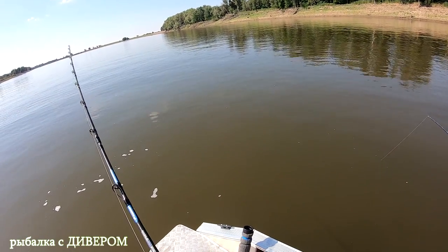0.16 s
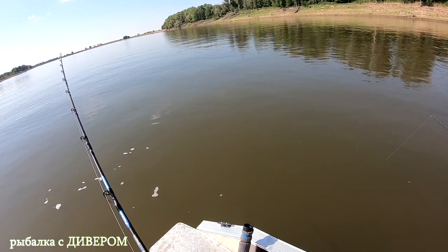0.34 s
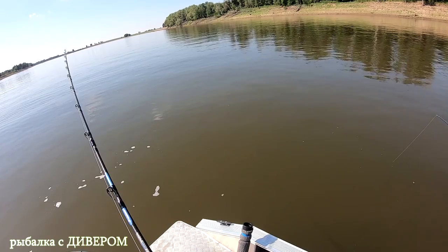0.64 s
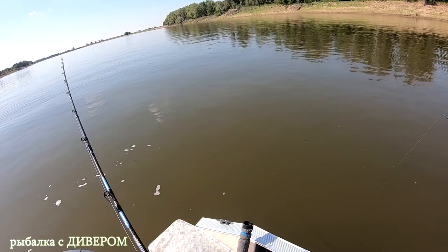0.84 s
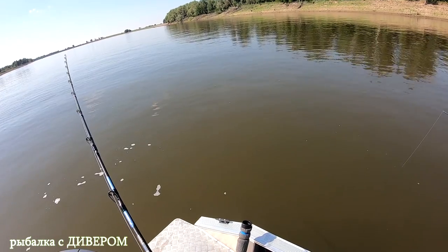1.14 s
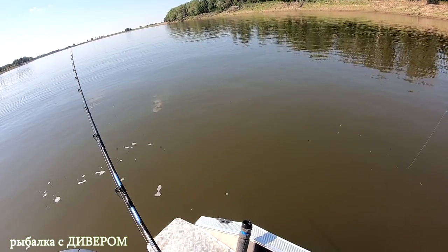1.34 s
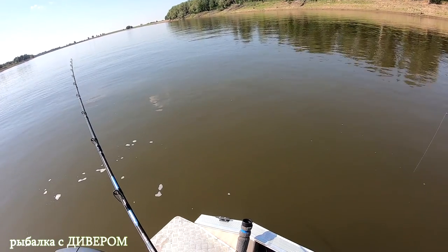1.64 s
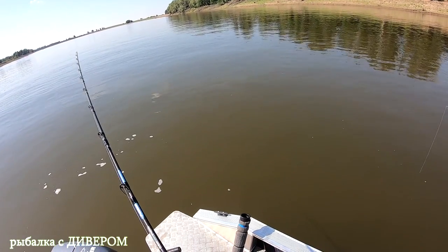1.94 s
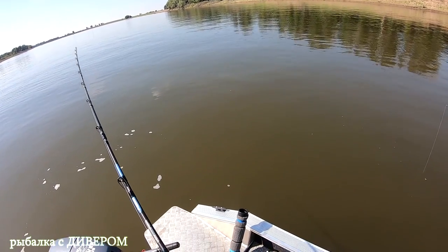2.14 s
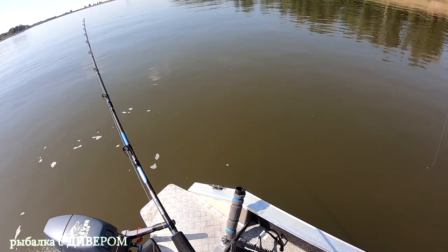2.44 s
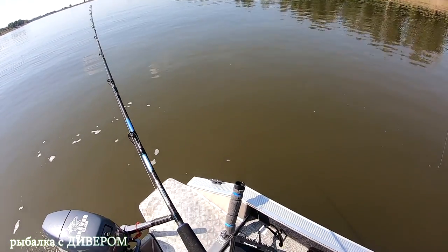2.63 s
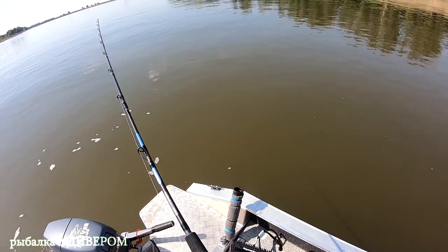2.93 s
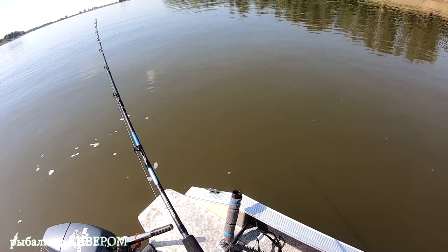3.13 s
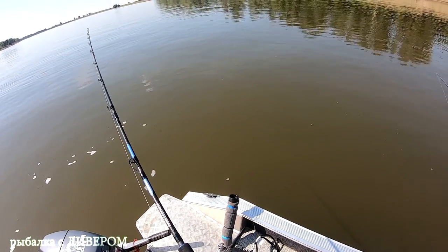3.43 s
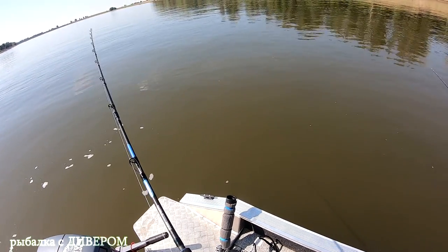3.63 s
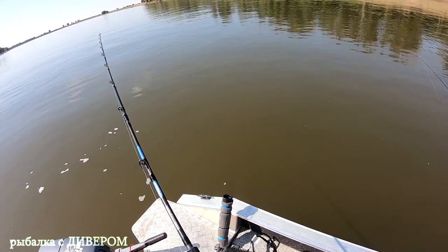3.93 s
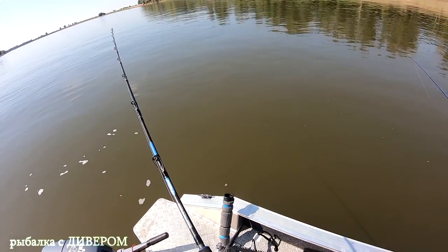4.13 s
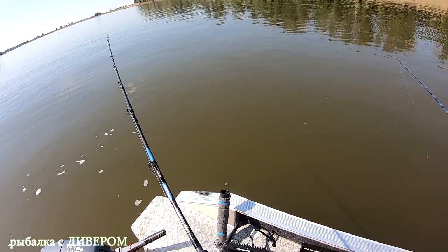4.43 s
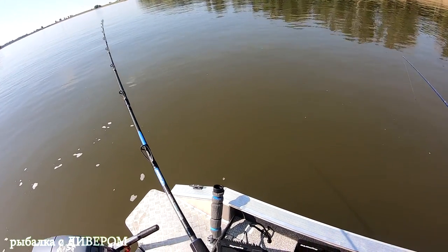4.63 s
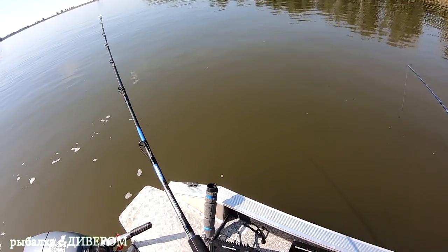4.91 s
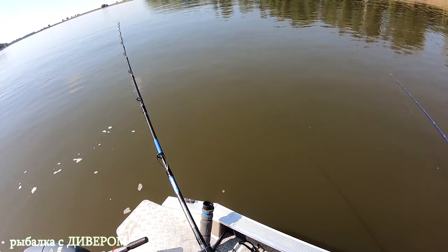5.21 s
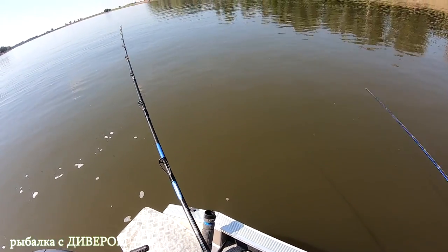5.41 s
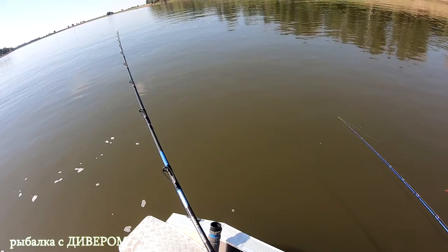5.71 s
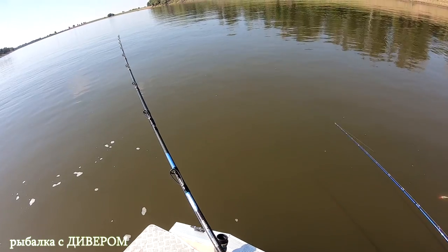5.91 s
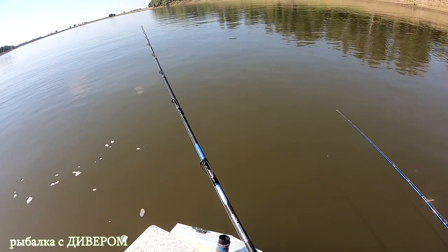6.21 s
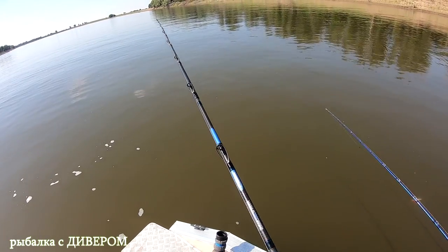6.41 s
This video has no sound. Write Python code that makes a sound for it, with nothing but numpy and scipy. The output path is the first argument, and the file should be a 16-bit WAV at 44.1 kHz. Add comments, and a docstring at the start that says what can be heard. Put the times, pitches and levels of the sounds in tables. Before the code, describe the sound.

Rough low-speed boat motor chugging at the stern, sharp exhaust pops alternating with weak wet gulps, hissing froth and metallic rattles.

```python
"""A small two-stroke outboard idles unevenly close by on a calm river, some 32 to 33 crank turns a second.
From the start low noise, block sway and wash run on; runs of charges pop sharply, weak turns puff and gulp.
On each turn gas hisses from the port and froths the water, a sizzle ticks and the piston slaps the cowl.
Hard knocks join at once and a loose part soon taps; after 2.3 s come water blips, a whine and whistles.
Pulses excite decaying resonators, noise is filtered and gated by the turns, and tones follow gliding phase."""
import sys
import numpy as np
from scipy import signal
from scipy.io import wavfile

SR = 44100
rng = np.random.default_rng(int(sys.argv[2]) if len(sys.argv) > 2 else 0)


def linear_from_db(decibels):
    """Turn decibels (scalar or array-like) into linear amplitude factors; 0 gives 1."""
    return 10 ** (np.asarray(decibels, float) / 20)


def to_wav(s):
    """Save 16-bit WAV."""
    ch = np.atleast_2d(s).T  # columns
    pcm = np.round(np.clip(ch, -1, 1) * 32767)  # PCM
    wavfile.write(sys.argv[1], SR, pcm.astype(np.int16))


N = 289296

# Levels are relative source levels; later gains and the rounding of peaks act upon them.
# runs of burning turns: t of first pop/s, burns in a row, first pop level/dB, last pop level/dB,
# first port hiss level/dB, last port hiss level/dB
BURN_RUNS = [(0.0256, 2, -5.5, -6, -37.0, -36), (0.1131, 4, -8.5, -5.5, -45, -41),
             (0.267, 5, -7.5, -7.5, -43, -42.5), (0.4201, 3, -7.5, -8, -52.5, -48),
             (0.5149, 5, -3.5, -10.5, -44.5, -50.5), (0.6771, 3, -5.0, -7, -41.5, -54),
             (0.8028, 3, -7, -7, -41.5, -47), (0.9277, 3, -6.5, -6.0, -43, -54),
             (1.0519, 3, -7.5, -9, -41.5, -47), (1.1743, 2, -5.5, -6.5, -38, -39.5),
             (1.2978, 2, -4, -7.0, -36.5, -34), (1.418, 2, -6, -6.5, -35.5, -51),
             (1.5099, 2, -7.5, -4.5, -38.5, -36.5), (1.6259, 3, -8, -11, -36, -50),
             (1.7443, 2, -8.5, -5.5, -36.5, -36.5), (1.86, 3, -6, -4, -40.5, -42.5),
             (2.0071, 2, -5.5, -8, -36.5, -40), (2.0947, 3, -10, -11.5, -46, -34),
             (2.2387, 2, -7, -14.5, -34.5, -38.5), (2.3256, 2, -8, -5.5, -34.5, -30.5),
             (2.4451, 3, -8, -9, -37, -47.5), (2.5342, 2, -5, -5.5, -36.5, -35.5),
             (2.66, 2, -5, -6, -37, -37), (2.788, 3, -5, -4, -35.5, -36), (2.9447, 2, -7, -4.5, -31, -33),
             (3.0658, 2, -5, -8, -34, -40), (3.1565, 3, -4, -10.5, -39, -51),
             (3.278, 2, -5.5, -13.5, -32.5, -35.5), (3.3961, 3, -7.5, -12, -40, -42),
             (3.5179, 3, -5.0, -8.5, -37.5, -40), (3.6408, 4, -6.5, -9, -35, -40.5),
             (3.7665, 2, -4.5, -9, -39.5, -36), (3.8591, 3, -10, -9, -48, -34),
             (3.9549, 1, -14.5, -14.0, -39, -37.5), (4.0204, 2, -7, -10, -35, -39),
             (4.1434, 2, -8, -5.5, -36.5, -38), (4.2332, 3, -7, -5.5, -45.5, -33),
             (4.3814, 2, -9, -6, -38, -36), (4.4646, 2, -9, -8, -36, -39.0),
             (4.5253, 2, -4, -4.5, -34, -34), (4.6116, 2, -8.5, -7, -44, -36.5),
             (4.6696, 3, -5, -6.5, -34.5, -46.5), (4.7583, 2, -10, -8, -46, -49.5),
             (4.8211, 2, -7, -8.5, -37, -36), (4.94, 2, -11, -3.5, -37.5, -32.5),
             (5.0298, 2, -7, -7, -43.5, -41), (5.1502, 2, -4.5, -10.0, -35.5, -36.0),
             (5.2715, 2, -7.5, -9, -39, -40), (5.3618, 3, -10.5, -7, -39, -34),
             (5.514, 2, -9, -6.5, -37.5, -37), (5.6023, 2, -10.5, -18, -38, -35),
             (5.66, 1, -8, -9.0, -42.5, -37.0), (5.7224, 3, -10, -12, -36, -44),
             (5.8464, 2, -6.5, -7, -37.5, -36), (5.9629, 2, -13, -7, -39.0, -36.0),
             (6.0572, 2, -4.5, -13.5, -34.0, -31), (6.1693, 1, -4.5, -5.5, -41.5, -38.5),
             (6.2548, 2, -8.5, -5.5, -35.5, -41), (6.3438, 2, -4, -6.5, -32.5, -35),
             (6.4586, 2, -7.5, -14.5, -37, -36.5)]
# usual length of a crank turn: t/s, period/s
TURN_PERIOD = [(0, .0315), (1.0, .0312), (1.3, .03), (6.56, .03)]
# brief fades of the weak puffs: t/s, half length/s, level change/dB
PUFF_FADES = [(2.29, .03, -1.5), (3.35, .06, -4.5), (6.53, .05, -1.5)]
# block rocking on its mount: multiple of crank speed, level/dB, lag behind the pop/rad
ROCKING_ORDERS = [(1, -29, 2.05), (2, -28, 1.0)]
# spectral envelope of the wash: f/Hz, relative density level/dB
WASH_SPECTRUM = [(410, -31), (700, -4), (845, -23.5), (1530, 0.5), (2080, -10.5), (2560, -4.5), (2930, -28),
                 (3250, -22), (4450, -13.5), (7120, -16), (8510, -9), (11100, -62.5), (18700, -120)]
# spectral envelope of the port hiss: f/Hz, relative density level/dB
HISS_SPECTRUM = [(290, -31), (500, 4.5), (641, -15.5), (833, -79.5), (983, -15), (1230, 2.5), (1540, -2.5),
                 (2080, -7), (2570, -20.5), (2930, -24), (3220, -1), (4540, -9.5), (6400, -12.5),
                 (7470, -34.5), (8510, -34), (11100, -66), (18700, -120)]
# cowl resonances: f/Hz, width/Hz, level/dB
COWL_MODES = [(1140, 96, -2), (1292, 110, -2), (1540, 83, -2), (1638, 260, -6.5), (2300, 200, -5.5),
              (2600, 83, -7), (3230, 94, -7), (3850, 170, -10), (6360, 840, -9.5), (7360, 220, -15)]
# rattle in time: t/s, low cowl panel level/dB (only its departure from the mean acts), bright sizzle level/dB
RATTLE_LEVELS = [(0.1, -42.5, -57.5), (1.36, -44, -61), (1.52, -39.5, -61), (2.04, -48, -55),
                 (2.38, -51, -64), (2.51, -42.5, -59), (3.17, -45.5, -86), (3.27, -49, -70),
                 (4.7, -46.5, -76.5), (6.1, -47.5, -76.5), (6.27, -39.5, -79), (6.56, -54, -92)]
# resonances of exhaust leg and hull: f/Hz, level/dB, t60/s
EXHAUST_MODES = [(72.9, -12, 0.05), (84.5, 11, 0.0043), (134.5, -5, 0.12), (160.6, 2, 0.13),
                 (208.3, -14.5, 0.13), (223.4, -14.5, 0.069), (420, -11, 0.084), (470, -15.5, 0.04),
                 (600, -14, 0.049)]
# hardest knocks of the block against the cowl: t/s, level/dB, f/Hz
HARD_KNOCKS = [(0.0463, -27, 1200), (0.168, -30, 1100), (0.5721, -40, 1160), (0.6768, -31.5, 1020),
               (0.9542, -29, 1100), (1.1712, -39.5, 1330), (1.297, -31, 1110), (1.411, -33.5, 1310),
               (1.5308, -28, 1240), (2.0595, -27, 1680), (2.6558, -26.5, 1160), (2.7808, -33.5, 1220),
               (2.9366, -37, 1160), (3.0592, -32, 1250), (3.789, -41, 1140), (4.013, -43, 1520),
               (4.5196, -29, 2340), (4.6638, -31, 1260), (4.9647, -46.5, 2600), (5.051, -24, 1480),
               (5.505, -29.5, 902), (5.748, -26.5, 1690), (5.8707, -34.5, 1670), (6.053, -30, 1610),
               (6.161, -31, 1080), (6.2493, -33, 1310)]
# taps of a loose metal part: t/s, level/dB, f/Hz
LOOSE_TAPS = [(0.212, -30, 3780), (1.253, -25.5, 7000), (1.7648, -36.5, 5840), (2.1122, -20.5, 5080),
              (2.2542, -25.5, 5730), (3.3052, -19, 4200), (3.667, -29.5, 6330), (3.955, -35, 7240),
              (3.991, -29, 5200), (4.005, -37.5, 5070), (4.367, -24.5, 7300), (4.458, -28.5, 7140),
              (4.662, -30, 5100), (5.416, -42.5, 5200), (5.985, -42, 5500), (6.338, -32.5, 6060)]
# hollow water blips: t/s, level/dB, f/Hz
WATER_BLIPS = [(2.294, -20.5, 470), (3.33, -21.5, 500), (3.605, -21, 470), (3.73, -25, 522),
               (4.216, -27, 487), (5.085, -28, 435), (5.419, -26.5, 470)]
# short gliding whistles: t/s, length/s, initial f/Hz, final f/Hz, level/dB
GLIDING_WHISTLES = [(2.484, 0.085, 2847, 2600, -55), (2.61, 0.055, 2325, 2290, -61),
                    (2.684, 0.06, 2725, 2530, -48), (2.951, 0.035, 2680, 2730, -51),
                    (2.975, 0.032, 2445, 2200, -50), (2.899, 0.053, 2230, 2320, -55),
                    (3.1, 0.042, 2173, 2300, -50), (3.848, 0.06, 2616, 2810, -52),
                    (4.289, 0.09, 2194, 2200, -50), (4.418, 0.054, 2292, 2270, -46),
                    (4.6, 0.062, 2556, 2750, -44.5), (4.776, 0.072, 2680, 2700, -52.5),
                    (4.967, 0.081, 2565, 2700, -47), (5.11, 0.033, 2800, 2750, -46),
                    (5.444, 0.05, 2130, 2280, -46), (4.153, 0.051, 1530, 1540, -46),
                    (4.82, 0.066, 1487, 1510, -44.5), (5.067, 0.039, 1510, 1460, -38),
                    (5.253, 0.065, 1540, 1532, -44), (3.37, .06, 2150, 2300, -48.5),
                    (3.44, .05, 2696, 2847, -54), (5.833, 0.14, 2180, 2280, -54),
                    (5.915, 0.084, 2134, 1964, -48)]
# likeness of left and right: f/Hz, correlation
STEREO_LIKENESS = [(60, 0.96), (200, 0.97), (300, 1), (500, 1), (700, 0.97), (2370, 0.66), (5000, 0.92),
                   (7000, 0.22), (8500, 0.05), (13000, .85)]
# balance of the pair: f/Hz, left minus right level/dB
STEREO_LEAN = [(60, 1), (300, -2), (700, -4.5), (2370, -0.5), (8060, -2)]

SURGE = 0.032  # share by which a burning turn is shorter, before the run starts are aligned
WEAK_PUFF_DB, WEAK_HISS_DB = -7.5, -11.5  # weak turn: puff level, and hiss relative to INNER_HISS_DB
INNER_HISS_DB, USUAL_POP_DB = -37, -7.0  # centres for hiss and pop inside a run
REVERSAL = 0.38  # alternate inner pops reverse this share of their departure from the usual
WEAK_FROTH_DB = -2.5  # a weak turn churns the water less
FIZZ_PER_S, FIZZ_DB = 500, 4.5  # bursting grains of froth: mean rate, gain before shaping
SLAP_DB, SLAP_SPREAD_DB, SLAP_EARLY_S = -28.5, 3.5, .005  # piston slap on every turn
SLAP_TOP_DB = 6.5  # added slap level on panels above 3 kHz
GULP_HZ, GULP_RISE_HZ_PER_S = 72, 7200  # mean bubble pitch at its reference instant, and rise
GULP_EARLY_S, GULP_T60_S = .0012, .08
DETUNE, COLOUR_DB = .045, 4  # froth in the leg: pitch share a step, spread of modes above 300 Hz
STEPS_BY_CHANCE = 1.2
STEPS_PER_POP_DB, STEPS_PER_HISS_DB = -.45, .25  # soft pops with much hiss ring higher
COLD_DROP = 0.16  # cooler unburnt gas lowers the leg's pitch by this share
PORT_SUCK_EARLY_S, PORT_SUCK_DB = .0098, 36.5  # suck at port opening; pulse area relative to turn level
WHINE_DB, WHINE_WANDER, WHINE_FROM_S = -61, 0.023, 2.3  # centre level, spread as share of pitch, start
WHISTLE_WAVER, WHISTLE_FLUTTER_DB = 0.018, 3.5  # spread as share of pitch, spread of level


def rms_one(x):
    """Normalization: the signal is scaled to unit rms."""
    return x / np.sqrt(np.mean(x ** 2) + 1e-20)


def at_hz(points, hz):
    """Spectral interpolation on a logarithmic frequency axis."""
    return np.interp(np.log(hz), np.log(np.array(points)[:, 0] + 1), np.array(points)[:, 1])


def in_time(rows):
    """Linear interpolation of table columns into control curves."""
    s, *columns = np.transpose(rows)
    return [np.interp(np.arange(N) / SR, s, c) for c in columns]


def clicks(s, size):
    """Impulsive excitation: single-sample impulses at the given times."""
    out = np.full(N, 1e-18)
    at = np.round(np.asarray(s) * SR).astype(int)
    inside = (at >= 0) & (at < N)
    np.add.at(out, at[inside], (size * np.ones(len(at)))[inside])
    return out


def hump(x, width_ms):
    """Pulse spreading: each impulse becomes a Gaussian gas pulse of equal area."""
    t_ms = np.arange(-600, 601) / SR * 1000
    bell = np.exp(-.5 * (t_ms / width_ms) ** 2)
    return signal.fftconvolve(x, bell / bell.sum(), "same")


def ring(x, hz, t60):
    """Damped resonance: a unit impulse starts a decaying cosine of height 1."""
    r, w = linear_from_db(-60 / (t60 * SR)), 2 * np.pi * hz / SR
    return signal.lfilter([1, -r * np.cos(w)], [1, -2 * r * np.cos(w), r * r], x)


def burst(x, rise_ms, fall_ms):
    """Two-stage relaxation: each impulse becomes an exponential rise and decay."""
    a, b = np.exp(-1000 / (rise_ms * SR)), np.exp(-1000 / (fall_ms * SR))
    decay = signal.lfilter([1], [1, -b], x)
    return signal.lfilter([1 - a], [1, -a], decay)


def drift(rate):
    """Slow random fluctuation: noise of unit rms through two equal poles at rate in Hz."""
    r = np.exp(-80 * np.pi * rate / SR)  # one step every 40 samples
    noise = rng.standard_normal(N // 40 + 2002)
    slow = signal.lfilter([1], [1, -2 * r, r * r], noise)[2000:]
    return np.interp(np.arange(N) / 40, np.arange(len(slow)), rms_one(slow))


def band(x, low_hz, high_hz):
    """Band limitation by a steep band-pass."""
    return signal.sosfilt(signal.butter(3, [low_hz, high_hz], "band", fs=SR, output="sos"), x)


def stereo_pair(mid, side, hz):
    """Interchannel coherence: mid and side are mixed by likeness, then leaned in level."""
    alike = np.clip(at_hz(STEREO_LIKENESS, hz), -1, 1)
    pair = np.sqrt(1 + alike) * mid + np.sqrt(1 - alike) * side * [[1], [-1]]
    return pair * linear_from_db(at_hz(STEREO_LEAN, hz) * np.array([[.5], [-.5]]))


def banded_noise(spectrum, low_hz, patchy_db, rate):
    """Turbulent spectrum: half-octave noise bands, each with its own flicker; rms 1."""
    out = 0
    edges = 30 * 2 ** np.arange(0, 9.3, .5)
    white = rng.standard_normal((2, 2, N))  # neighbouring bands use different noise
    for k, (low, high) in enumerate(zip(edges, edges[1:])):
        if low > low_hz:
            sos = signal.butter(2, [low, high], "band", fs=SR, output="sos")
            mid, side = signal.sosfilt(sos, white[k % 2])
            hz = np.sqrt(low * high)
            gain = linear_from_db(at_hz(spectrum, hz) + patchy_db * drift(rate))
            out = out + gain * stereo_pair(mid, side, hz)
    return rms_one(out)


def fizz():
    """Bubble bursting: a steady gain plus tiny random grains; rms 1."""
    height = linear_from_db(2.0 * np.minimum(rng.exponential(1, N), 4))
    born = (rng.random(N) < FIZZ_PER_S / SR) * height
    return rms_one(1 + linear_from_db(FIZZ_DB) * burst(born, rise_ms=0.19, fall_ms=0.88))


def turns(puff_spread_db=-0.33, hiss_spread_db=0.0, pop_spread_db=-1.0):
    """Intermittent combustion: every turn as time, burning or not, level and hiss; weak turns fill the gaps."""
    s, count, first_db, last_db, first_hiss, last_hiss = np.transpose(BURN_RUNS)
    usual = np.interp(s, *np.transpose(TURN_PERIOD))
    start = 1 + np.r_[0, np.cumsum(np.round(np.diff(s) / usual[1:]))].astype(int)
    every = np.arange(start[-1] + 5)
    run = np.maximum(np.searchsorted(start, every, "right") - 1, 0)
    place, count = every - start[run], np.round(count)[run]
    burns = (place >= 0) & (place < count)
    inner = (place > 0) & (place < count - 1)

    # shorter burning turns, stretched to meet the run starts
    spent = np.r_[0, np.cumsum(1 - SURGE * burns)][:-1]
    known_spent = np.r_[0, spent[start], spent[-1]]
    known_s = np.r_[s[0] - usual[0], s, s[-1] + 4 * usual[-1]]
    when = np.interp(spent, known_spent, known_s)

    luck = rng.standard_normal((len(every), 2))
    slope_db = (last_db - first_db)[run] * (place / np.maximum(count - 1, 1) - .5)
    pop = (first_db + last_db)[run] / 2 + slope_db + pop_spread_db * luck[:, 0] * inner
    pop -= (1 + REVERSAL) * (pop - USUAL_POP_DB) * (inner & (place % 2 == 1))
    puff = WEAK_PUFF_DB + puff_spread_db * luck[:, 0]
    for at, half, db in PUFF_FADES:
        puff += db * np.clip(2 - 2 * abs(when - at) / half, 0, 1)

    mean_hiss = (first_hiss + last_hiss)[run] / 2
    inner_hiss = INNER_HISS_DB + 0.32 * (mean_hiss - INNER_HISS_DB) + 1.6 * luck[:, 1]
    end_hiss = np.where(place > 0, last_hiss[run], first_hiss[run])
    pop_hiss = np.where(inner, inner_hiss, end_hiss)
    weak_hiss = INNER_HISS_DB + WEAK_HISS_DB + hiss_spread_db * luck[:, 1]
    return when, burns, np.where(burns, pop, puff), np.where(burns, pop_hiss, weak_hiss)


def hull_rumble():
    """Hydrodynamic buffeting: low hull noise shared by both ears, with deep wind noise in antiphase."""
    sos = signal.butter(2, [60, 250], "band", fs=SR, output="sos")
    low = signal.sosfilt(sos, rng.standard_normal((2, N)))
    wind = band(rng.standard_normal(N), low_hz=22, high_hz=90) * [[1], [-1]]
    return linear_from_db(-30) * stereo_pair(*rms_one(low), hz=120) + linear_from_db(-44.5) * rms_one(wind)


def rocking(when):
    """Forced vibration: the block sways at the lowest multiples of crank speed."""
    crank = 2 * np.pi * np.interp(np.arange(N) / SR, when, np.arange(len(when)))
    return sum(np.sqrt(2) * linear_from_db(db + 1.2 * drift(2.0)) * np.cos(m * crank - lag)
               for m, db, lag in ROCKING_ORDERS)


def wash():
    """Bubbly turbulence: continuous water noise carries the grains of bursting froth."""
    return linear_from_db(-47.5) * fizz() * banded_noise(WASH_SPECTRUM, low_hz=900, patchy_db=2.5, rate=2.8)


def froth(when, db):
    """Gas-driven agitation: rough low water noise swells with exhaust, most with the hard pops."""
    luck = np.clip(rng.standard_normal(len(db)), -2, 1)
    size = linear_from_db(0.85 * db + 3.0 * luck)
    swell = burst(clicks(when - .007, size), rise_ms=2.7, fall_ms=6.2) + linear_from_db(-30.0)
    churn = band(rng.standard_normal((2, N)), low_hz=323, high_hz=694)
    churn = band(churn, low_hz=191, high_hz=647)
    return linear_from_db(-23.5) * swell * stereo_pair(*rms_one(churn), hz=400)


def cowl(when, gate, low_db):
    """Panel resonance: narrow modes shaken by noise with each spit and struck by each piston slap."""
    out = 0
    for hz, width, level_db in COWL_MODES:
        r = np.exp(-np.pi * width / SR)
        loose_db = low_db - low_db.mean() if hz < 1400 else 0
        shake_gain = (gate + linear_from_db(-53.0)) * linear_from_db(level_db + loose_db + 3.44 * drift(20.0))
        shake = rng.standard_normal((2, N)) * shake_gain
        time_luck, level_luck = rng.standard_normal((2, len(when)))
        slap_db = SLAP_DB + (SLAP_TOP_DB if hz > 3000 else 0) + level_db
        slap_db = slap_db + SLAP_SPREAD_DB * np.clip(level_luck, -2, 1.5)
        slap_s = when - SLAP_EARLY_S + 0.0014 * time_luck
        shake[0] += clicks(slap_s, linear_from_db(slap_db)) * linear_from_db(loose_db)
        gain = np.sqrt(1 - r * r)
        poles = [1, -2 * r * np.cos(2 * np.pi * hz / SR), r * r]
        mid, side = signal.lfilter([gain, 0, -gain], poles, shake)
        out = out + stereo_pair(mid, side, hz)
    return linear_from_db(-5.5) * out


def gulps(when, db):
    """Bubble oscillation: unburnt gas leaves under water as one big bubble, its tone rising as it shrinks."""
    out, t = np.zeros(N + SR), np.arange(-150, 1600) / SR
    luck = rng.standard_normal((len(when), 3))
    onset = np.clip(1 + t / 0.0057, 0, 1) ** 2
    decay = linear_from_db(-60 * np.maximum(t, 0) / GULP_T60_S)
    swell = onset * decay * np.clip((t[-1] - t) / 0.015, 0, 1)
    for s, level_db, (pitch_luck, rise_luck, time_luck) in zip(when, db, luck):
        hz = GULP_HZ * (1 + 0.14 * np.clip(pitch_luck, -1.5, 1.5))
        rise = GULP_RISE_HZ_PER_S * (1 + 0.074 * rise_luck)
        cycles = hz * t + rise * t ** 2 / 2
        at = int((s - GULP_EARLY_S + .0008 * time_luck) * SR) + 2000
        out[at:at + len(t)] += linear_from_db(level_db + 4.5) * swell * np.cos(2 * np.pi * (cycles - .07))
    out = out[2150:N + 2150]  # removes the margin and the 150-sample lead
    return signal.sosfilt(signal.butter(2, 36, "high", fs=SR, output="sos"), out)


def port_gate(when, hiss_db):
    """Flow release: gas spits some ms ahead of the pop as the port opens, and again more softly near it."""
    size = linear_from_db(hiss_db)
    opening = burst(clicks(when - .0095, size), rise_ms=3.44, fall_ms=3.82)
    return opening + linear_from_db(-13.0) * burst(clicks(when - .0015, size), rise_ms=0.16, fall_ms=5.6)


def spit(gate):
    """Jet noise: turbulent hiss is modulated by port flow and bursting grains."""
    noise = banded_noise(HISS_SPECTRUM, low_hz=900, patchy_db=-2.0, rate=4)
    return linear_from_db(5.5) * gate * fizz() * noise


def exhaust(when, burns, db, hiss_db):
    """Pulse-excited resonance: burns give a broad suck cut by a sharp pop, weak turns a soft early puff."""
    luck = rng.standard_normal((len(when), len(EXHAUST_MODES) + 2))
    when = when + .0003 * luck[:, 1]  # ignition scatter
    puff_s = when + 0.0025 * luck[:, -1]  # unburnt gas leaves a little early or late
    burn_steps = STEPS_PER_POP_DB * (db - USUAL_POP_DB) + STEPS_PER_HISS_DB * (hiss_db - INNER_HISS_DB)
    tuning = STEPS_BY_CHANCE * luck[:, -2] + burns * burn_steps
    tuning = np.clip(np.round(tuning), -3, 3)
    pops, puffs = np.zeros(N), np.zeros(N)
    for k, (hz, level_db, t60) in enumerate(EXHAUST_MODES):
        colour_db = (COLOUR_DB if hz > 300 else 1.0) * np.clip(luck[:, k], -1.5, 1.5)
        size = linear_from_db(db + level_db + colour_db)
        for step in range(-3, 4):
            tuned_hz, dealt = hz * (1 + DETUNE * step), size * (tuning == step)
            pops += ring(clicks(when, dealt * burns), tuned_hz, t60)
            puffs += ring(clicks(puff_s - .002, dealt * ~burns), tuned_hz * (1 - COLD_DROP), t60)

    def shifted(x, s):
        """Time translation: a negative shift advances the signal."""
        return np.roll(x, int(s * SR))

    sharp_pop = hump(shifted(pops, -.00055), width_ms=.6)
    broad_suck = linear_from_db(4.6) * hump(shifted(pops, -.002), width_ms=1.95)
    soft_puff = hump(puffs, width_ms=0.57) - 0.5 * hump(shifted(puffs, -0.0025), width_ms=4.6)
    port_suck = hump(clicks(when - PORT_SUCK_EARLY_S, linear_from_db(db + PORT_SUCK_DB)), width_ms=1.5)
    out = sharp_pop - broad_suck + linear_from_db(-11.0) * soft_puff - port_suck
    # water over the outlet muffles the top; a side cavity swallows one band
    out = signal.sosfilt(signal.butter(6, 690, fs=SR, output="sos"), out)
    out -= 0.62 * signal.lfilter(*signal.iirpeak(310, 4.5, fs=SR), out)
    return signal.sosfilt(signal.butter(1, 45, "high", fs=SR, output="sos"), out)


def sizzle(when, level_db):
    """Gated noise: a bright tick on every turn, independent at each ear."""
    tick_s = when - .006 + 0.00051 * rng.standard_normal(len(when))
    size = linear_from_db(2.4 * rng.standard_normal(len(when)))
    tick = burst(clicks(tick_s, size), rise_ms=.2, fall_ms=0.52)
    noise = rms_one(band(rng.standard_normal((2, N)), low_hz=7800, high_hz=11300))
    return linear_from_db(level_db + 17.5) * tick * noise


def knocks():
    """Impact radiation: each hard knock gives a short scuff of noise and a panel ring."""
    s, db, hz = np.transpose(HARD_KNOCKS)
    noise = rms_one(band(rng.standard_normal((2, N)), low_hz=930, high_hz=7000))
    scuff = burst(clicks(s, linear_from_db(db)), rise_ms=0.18, fall_ms=2.1) * noise
    rings = sum(ring(clicks([a], linear_from_db(d - 4.0)), h, .018) for a, d, h in HARD_KNOCKS)
    return linear_from_db(-9.0) * stereo_pair(*scuff, hz=3000) + stereo_pair(rings, 0 * rings, hz=1200)


def ticks():
    """Modal impact: each tap of a loose metal part excites two damped modes."""
    out = np.zeros(N)
    for s, db, hz in LOOSE_TAPS:
        tap = clicks([s], linear_from_db(db))
        out += ring(tap, hz, 0.0044) + linear_from_db(-10.5) * ring(tap, 0.73 * hz, 0.0034)
    return out * linear_from_db(np.array([[-2], [2]]))


def blips():
    """Bubble resonance: small bubbles at the outlet ring briefly."""
    return sum(ring(hump(clicks([s], linear_from_db(db)), width_ms=0.047), hz, 0.093) for s, db, hz in WATER_BLIPS)


def whine():
    """Frequency modulation: a faint unsteady tone glides between the whistles above 2 kHz."""
    points = []
    for s, length, from_hz, to_hz, db in GLIDING_WHISTLES:
        if from_hz > 2000:
            points += [(s, from_hz), (s + length, to_hz)]
    path, = in_time(sorted(points))
    hz = path * (1 + WHINE_WANDER * drift(8) + 0.0028 * drift(38))
    fade_in = np.clip(np.arange(N) / SR - WHINE_FROM_S, 0, .5) * 2
    tone = fade_in * linear_from_db(WHINE_DB + 6.5 * drift(8.1)) * np.sin(2 * np.pi * np.cumsum(hz) / SR)
    return tone * linear_from_db(np.array([[-1], [1]]))


def whistles():
    """Integrated phase: short tones glide in pitch while pitch and level fluctuate."""
    out, t = np.zeros(N), np.arange(N) / SR
    waver, flutter = 1 + WHISTLE_WAVER * drift(40), linear_from_db(WHISTLE_FLUTTER_DB * drift(49))
    for s, length, from_hz, to_hz, db in GLIDING_WHISTLES:
        inside = (t > s) & (t < s + length)
        u = (t[inside] - s) / length
        hz = (from_hz + (to_hz - from_hz) * u) * waver[inside]
        swell = np.sqrt(2 * np.sin(np.pi * u))
        out[inside] += linear_from_db(db) * flutter[inside] * swell * np.sin(2 * np.pi * np.cumsum(hz) / SR)
    return out * linear_from_db(np.array([[-1], [1]]))


def scene():
    """Superposition: engine, cowl and water sound together."""
    when, burns, db, hiss_db = turns()
    low_db, bright_db = in_time(RATTLE_LEVELS)
    gate = port_gate(when, hiss_db)
    water = hull_rumble() + wash() + froth(when, db + WEAK_FROTH_DB * ~burns) + blips()
    engine = rocking(when) + gulps(when[~burns], db[~burns]) + exhaust(when, burns, db, hiss_db)
    engine = engine + spit(gate) + sizzle(when, bright_db)
    body = cowl(when, gate, low_db) + knocks() + ticks()
    return water + engine + body + whine() + whistles()


def top_cut(x):
    """Nothing passes above the cut-off."""
    return signal.sosfilt(signal.butter(12, 15700, fs=SR, output="sos"), x)


def record(dry):
    """Band limitation and saturation: the microphone loses deep bass and high treble and rounds peaks."""
    x = signal.sosfilt(signal.butter(2, 20, "high", fs=SR, output="sos"), dry)
    x = signal.sosfilt(signal.butter(2, 9000, fs=SR, output="sos"), x)
    x = 1.33 * np.tanh(x / 1.857)
    return top_cut(x)


dry = scene()
out = record(dry)
to_wav(out)
```